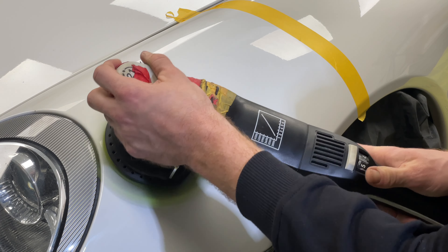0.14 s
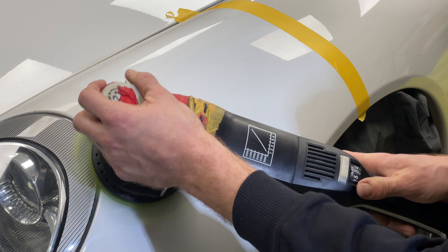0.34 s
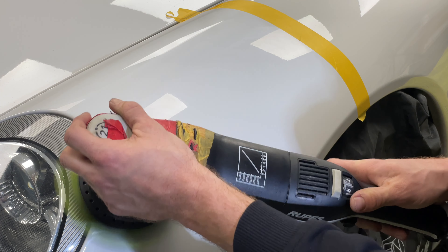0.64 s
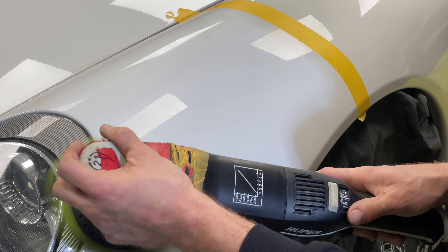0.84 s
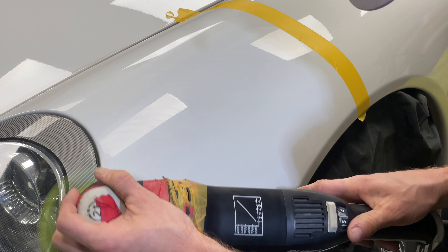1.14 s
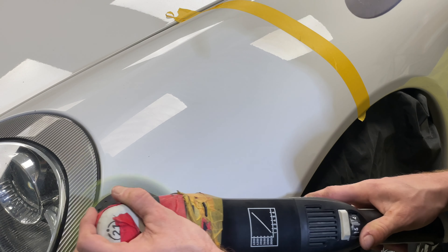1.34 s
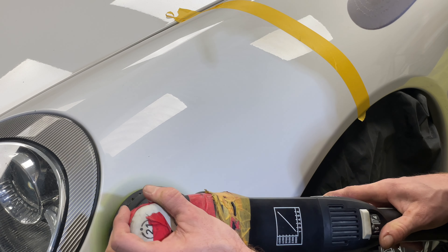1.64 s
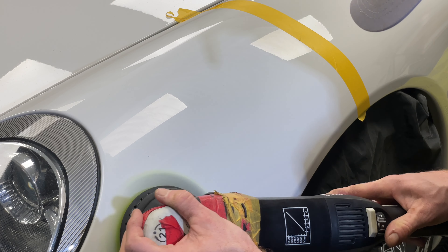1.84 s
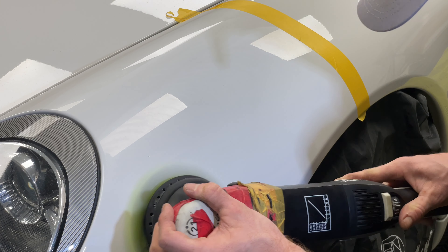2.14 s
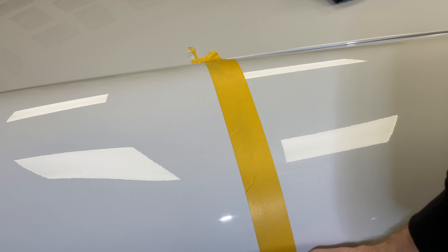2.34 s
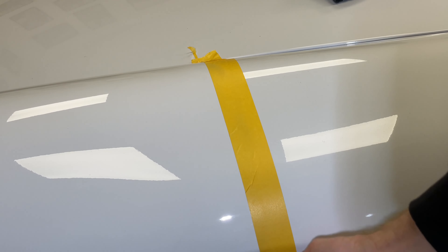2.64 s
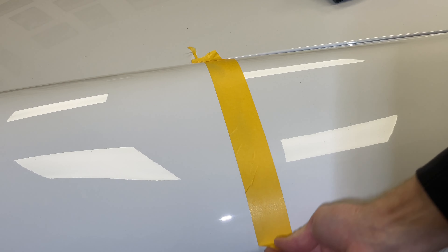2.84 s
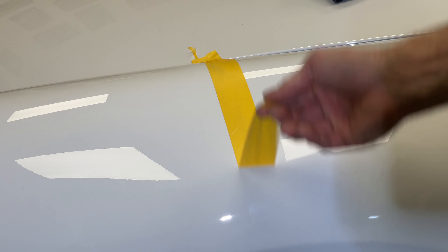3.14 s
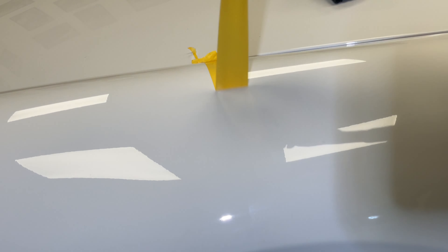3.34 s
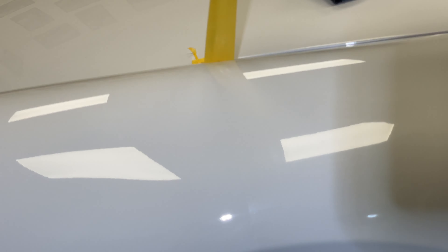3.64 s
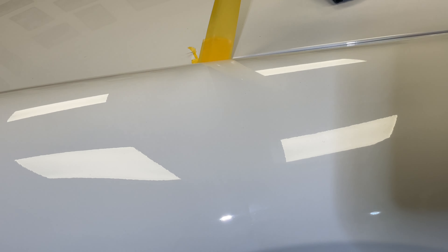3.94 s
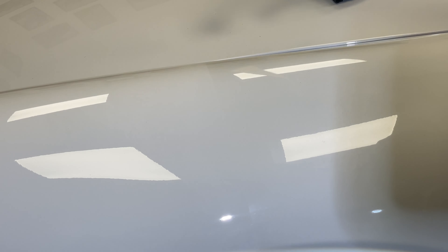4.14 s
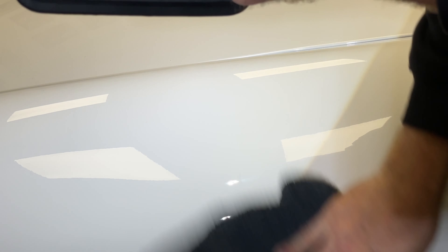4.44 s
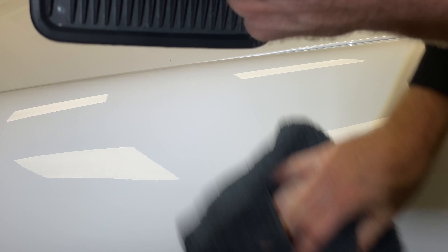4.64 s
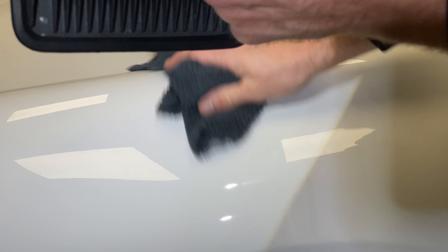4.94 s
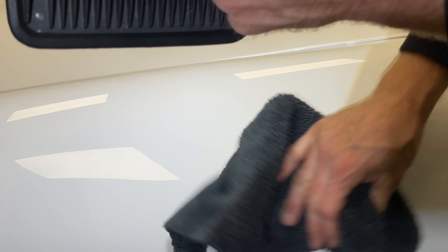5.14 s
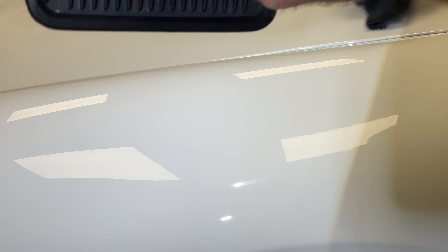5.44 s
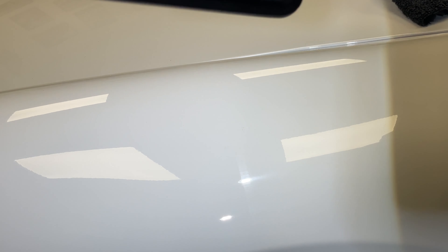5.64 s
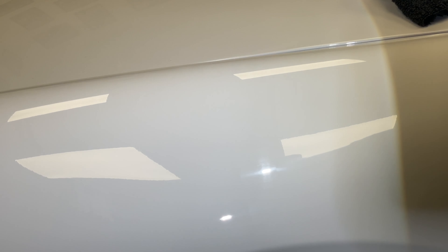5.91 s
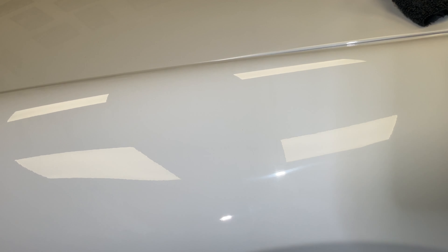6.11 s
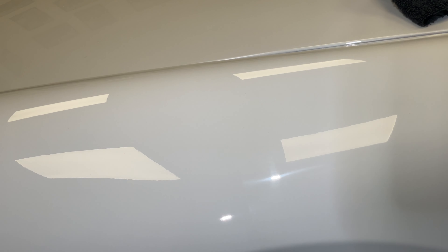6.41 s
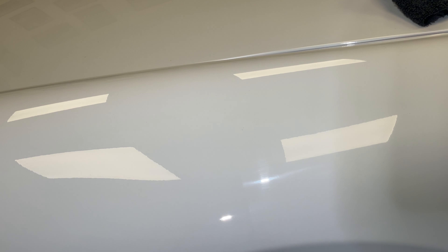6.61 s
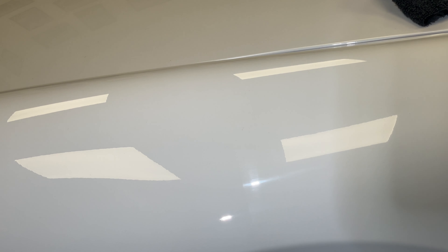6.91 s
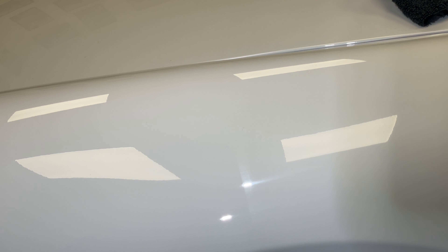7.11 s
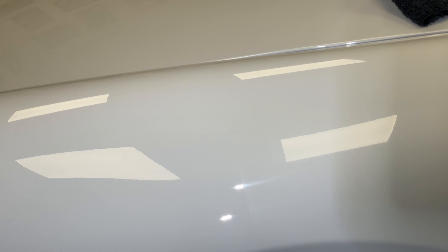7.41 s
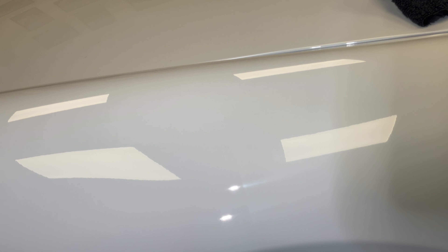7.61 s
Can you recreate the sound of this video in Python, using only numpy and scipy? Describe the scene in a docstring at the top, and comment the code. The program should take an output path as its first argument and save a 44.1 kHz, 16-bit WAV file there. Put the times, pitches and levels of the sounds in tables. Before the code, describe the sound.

Close in a small workshop, an orbital polisher throbs, hisses and whines steadily on a car wing, then stops dead. Much quieter, masking tape peels away in crackling pulls that make the panel drum, and snaps free with sharp cracks and a low boom. A cloth wipes softly with dull thumps on the metal, then rustles and clicks in the hands, leaving a faint low room rumble.

```python
"""First an orbital polisher throbs, rubs and whines on a car wing in a workshop, then stops abruptly.
Masking tape crackles off the panel, which drums along and booms when the tape snaps free.
A cloth wipes the paint, then rustles and clicks softly in the hands over a low room rumble.
Machine tones are sines locked to shaft rotation; rub, tape and cloth are coloured random grains;
blows and clicks excite resonances."""
import sys
import numpy as np
from scipy import signal
from scipy.fft import rfft, irfft, next_fast_len
from scipy.io import wavfile
from scipy.ndimage import uniform_filter1d, map_coordinates

SR = 44100
rng = np.random.default_rng(int(sys.argv[2]) if len(sys.argv) > 2 else 0)


def waveform_to_disk(signal):
    """Save audio, clipped to [-1, 1], as 16-bit WAV at the path in sys.argv[1]."""
    frames = np.transpose(np.atleast_2d(signal))
    scaled = np.clip(frames, -1, 1) * 32767
    samples = np.round(scaled).astype(np.int16)
    wavfile.write(sys.argv[1], SR, samples)


N = 342657
TIME = np.arange(N) / SR
PADDED = next_fast_len(N + SR // 10)
FFT_HZ = np.arange(PADDED // 2 + 1) * SR / PADDED
SIDES = np.array([[.5], [-.5]])   # left and right share a difference equally

# speed of the gears: (time [s], tooth-mesh frequency [Hz])
MESH_SPEED = [(0, 2919), (.3, 2932), (.9, 2929), (1.3, 2921), (1.65, 2926), (2.04, 2931), (2.24, 2924)]
TEETH, PINION_TEETH, MAINS_HZ = 43, 6, 50
SPEED_WAVER = .0009   # as a share of the speed
ORBIT_RIPPLE = .34 - .18   # swing of whine and housing level, once a turn


def polisher():
    """A mains motor drives the orbiting pad through one gear pair; the pad's swing loads its sounds each turn."""
    mesh_hz = in_time(MESH_SPEED)[0]
    turns = np.cumsum(mesh_hz / TEETH * (1 + SPEED_WAVER * drift(40))) / SR
    motor_turns = turns * TEETH / PINION_TEETH
    torque = np.sin(2 * np.pi * 2 * MAINS_HZ * TIME)   # pulses twice each mains cycle
    swing = np.sin(2 * np.pi * turns)   # the eccentric loads pad and teeth once a turn
    orbit = pad(turns, swing)
    whine, shrill = gears(turns, motor_turns, torque)
    rattle = housing(turns) * (1 + 0.08 * torque)
    hiss = rattle * (1 + ORBIT_RIPPLE * swing) + (rub() + judder()) * (1 + 0.053 * swing)
    # bodywork and walls throw the hiss back and ripple its colour
    hiss = hiss + amp(-11) * reflections(hiss, t60=.2)
    return orbit + whine * (1 + ORBIT_RIPPLE * swing) + shrill + motor(motor_turns) + hiss


# upper orbit tones: (multiple of spindle speed, level [dB], re 1.77 dB below the throb)
ORBIT_TONES = [(4, -22), (5, -16.5), (6, -20.5), (7, -24.5)]
# third harmonic of the pad: (time [s], level [dB])
THIRD_LEVEL = [(0.0, -46.5), (0.17, -46.5), (0.34, -58), (0.58, -39.5), (1.61, -42.5), (2.222, -37.5)]
# the pad slides down the wing: (time [s], position [0 on top to 1 at the lower edge])
TRAVEL = [(.55, 0.074), (1.3, 1)]
# fundamental: (level with the pad on top [dB], level at the lower edge [dB])
THROB_LEVELS = (-28.5, -28)
# second harmonic: (level with the pad on top [dB], level at the lower edge [dB])
SECOND_LEVELS = (-34.5, -38.5)


def pad(turns, swing):
    """The orbiting pad throbs once a turn, with harmonics whose balance shifts as it slides down the wing."""
    travel = in_time(TRAVEL)[0]
    throb_db, second_db = (top + (edge - top) * travel for top, edge in (THROB_LEVELS, SECOND_LEVELS))
    throb = np.sqrt(2) * (amp(throb_db) * swing - amp(second_db) * np.sin(4 * np.pi * turns))
    unsteady_turns = turns + .012 * drift(35)
    shake = amp(throb_db - 1.77) * tones(unsteady_turns, ORBIT_TONES, waver_db=3, waver_rate=11)
    third = amp(in_time(THIRD_LEVEL)[0]) * tones(turns, [(3, 0)], waver_db=.8, waver_rate=7)
    return throb + shake + third


# gear tones that follow the whine: (multiple of spindle speed, level against the whine [dB])
MESH_TONES = [(43, 1), (44, -13), (45, -19.5), (86, -21.5), (172, -39)]
# gear whine: (time [s], level [dB])
WHINE_LEVEL = [(0, -32), (.15, -29.5), (.35, -25), (.82, -25), (.92, -29), (1.1, -32), (1.22, -45),
               (1.55, -34.5), (2.24, -28.5)]
# higher companion of the whine: (time [s], level [dB])
UPPER_WHINE_LEVEL = [(0, -33.5), (.33, -31), (.58, -32), (0.898, -38), (1.199, -45), (1.46, -39.5),
                     (1.75, -43), (2.05, -53)]
# two shrill partials above the whine: (time [s], level [dB])
SHRILL_LEVEL = [(0, -55), (.6, -39.5), (1.1, -38), (1.55, -52), (2.2, -46.5)]
UPPER_WHINE_ORDER = 50   # multiple of spindle speed
BACKLASH_TURNS, WHINE_WAVER_DB, TORQUE_RIPPLE = .00065, 1.15, .34


def gears(turns, motor_turns, torque):
    """Meshing teeth whine at multiples of the spindle speed; backlash jitters their phase."""
    play = turns + BACKLASH_TURNS * drift(120)   # the teeth meet early or late
    whine = amp(in_time(WHINE_LEVEL)[0]) * tones(play, MESH_TONES, WHINE_WAVER_DB, waver_rate=36)
    whine = whine * (1 + TORQUE_RIPPLE * torque)
    upper = tones(play, [(UPPER_WHINE_ORDER, 0)], waver_db=1.8, waver_rate=40)
    upper = amp(in_time(UPPER_WHINE_LEVEL)[0]) * upper
    shrill = tones(motor_turns, [(8, 0)], waver_db=1.5, waver_rate=50)
    shrill = shrill + tones(play, [(62, -7.5)], waver_db=2.5, waver_rate=50)
    return whine + upper, amp(in_time(SHRILL_LEVEL)[0]) * shrill


# armature and fan: (multiple of motor speed, level against the motor curve [dB])
MOTOR_TONES = [(2, -5), (4, -1), (12, -5.5), (14, -14), (16, -5), (24, -19)]
# armature and fan together: (time [s], level [dB])
MOTOR_LEVEL = [(0, -51), (1.38, -40.5), (2.24, -52)]


def motor(motor_turns):
    """Armature and fan sing at multiples of the motor speed."""
    return amp(in_time(MOTOR_LEVEL)[0]) * tones(motor_turns, MOTOR_TONES, waver_db=0.5, waver_rate=21)


def tooth_knocks(turns, repeat_share=0.092, size=640):
    """Gear teeth knock unevenly: partly by chance, partly in a pattern of wear that comes round every turn."""
    wear = unit(irfft(np.exp(2j * np.pi * rng.random(size // 2 + 1))))
    share = np.clip(repeat_share, 0, 1)
    repeating = wear[(turns * size).astype(int) % size]
    return np.sqrt(share) * repeating + np.sqrt(1 - share) * grains(14000, spread_db=-0.5)


# housing modes: (frequency [Hz], width before broadening [Hz], level against its curve [dB],
# curve [0 lower, 1 upper])
HOUSING_MODES = [(2900, 350, 2, 0), (3147, 280, -6, 0), (3500, 460, -1.5, 1), (3880, 560, -9.5, 1),
                 (6520, 1500, -8.5, 1)]
# housing ring: (time [s], level of lower modes [dB], level of upper modes [dB])
HOUSING_LEVEL = [(0, -31.5, -29.5), (.54, -35.5, -27.5), (1.08, -38, -33), (1.4, -39.5, -39.5),
                 (2.22, -33, -39)]
HOUSING_FLUTTER_DB = 1.2


def housing(turns):
    """Tooth knocks ring the gear housing; each mode flutters under the grip."""
    low_db, high_db = in_time(HOUSING_LEVEL)
    out = 0
    for hz, width, db, upper in HOUSING_MODES:
        level_db = db + (high_db if upper > .5 else low_db) + HOUSING_FLUTTER_DB * drift(22)
        once = resonate(tooth_knocks(turns), hz, 1.2 * width)
        out = out + amp(level_db) * unit(resonate(once, hz, 1.2 * width))
    return out


# colour of foam rub and cooling air: (frequency [Hz], relative density [dB per Hz])
RUB_COLOUR = [(30, -22.5), (100, -11), (200, -8), (400, -7), (680, -3), (900, -3), (1500, -6.5), (2000, -7),
              (2500, -2), (4200, -7), (5000, -9), (8800, -9.5), (11600, -12.5), (15500, -30.5)]
RUB_DB = -36.5   # rms between 450 and 1800 Hz


def rub():
    """Foam rub and cooling air make one unsteady hiss of dense grains."""
    rubbing = grains(16000, spread_db=-0.05) * amp(0.86 * drift(50))
    return amp(RUB_DB) * colour(rubbing, RUB_COLOUR, band=(450, 1800))


# resonances under the pad: (frequency [Hz], width of each of two passes [Hz], level before bursts [dB])
JUDDER_MODES = [(633, 190, -41), (750, 110, -45), (980, 240, -49.5)]
JUDDER_BURST_DB = 3


def judder():
    """The pad grabs and slips in irregular bursts, which growl in the panel."""
    out = 0
    for hz, width, db in JUDDER_MODES:
        burst = amp(db + JUDDER_BURST_DB * drift(24))
        once = resonate(grains(1500, spread_db=1.5), hz, width)
        out = out + burst * unit(resonate(once, hz, width))
    return out


# pulls: (time of full speed [s], attack [s], hold [s], crackle level [dB], panel drumming level [dB])
PULLS = [(2.852, 0.059, 0.34, -56.5, -48.5), (3.132, 0.22, 0.06, -47, -44.5),
         (3.215, 0.21, 0.16, -42, -42.5), (3.544, 0.12, 0.07, -44.5, -44), (3.768, 0.073, 0.0068, -56, -67),
         (3.838, 0.038, 0.0089, -53.5, -60), (4.022, 0.15, 0.006, -44.5, -52),
         (4.037, .03, 0.0049, -42, -60)]
# colour of the crackle: (frequency [Hz], relative density [dB per Hz])
TAPE_COLOUR = [(100, 3), (350, 2), (700, 0), (1300, -1), (2200, -3.5), (3500, -5.5), (6000, -10),
               (9000, -7), (11500, -11), (13000, -23), (15500, -22.5)]
# wing panel, for drumming and blows: (frequency [Hz], mode level [dB], undamped t60 [s])
PANEL_MODES = [(69.6, -2, 0.71), (134.8, -1.5, 0.31), (167.4, -14.5, 0.58), (200.7, -7.5, 0.21),
               (228.5, -10.5, 0.27), (267.5, -6.5, 0.2), (340, -3.5, 0.11), (372, -10, 0.19),
               (438, -12, 0.051), (480, -12, 0.058)]
PULL_RELEASE_S, TAPE_FREE_S = 0.087, 4.04
# the taut tape damps the panel and favours its higher modes
DRUM_RING_SHARE, DRUM_TILT_DB_PER_OCTAVE = 0.12, 9.5


def tape():
    """With each pull, glue threads break by the thousand and tug at the sheet metal."""
    pulls = np.array([swell(at, attack_s, hold_s, PULL_RELEASE_S) for at, attack_s, hold_s, _, _ in PULLS])
    crackle_db, drum_db = np.transpose(PULLS)[3:, :, None]
    breaks = grains(9000, spread_db=0.6) * amp(1.4 * drift(130))
    # the taut strip rings at pitches that keep trading strength
    strip = sum(resonate(breaks, hz, 0.036 * hz) * drift(12) for hz in np.geomspace(450, 4000, num=14))
    crackle = colour(breaks + 0.45 * strip, TAPE_COLOUR, band=(700, 7000))
    drum = np.zeros(N)
    for k, (hz, db, t60) in enumerate(PANEL_MODES):
        gain = amp(db + DRUM_TILT_DB_PER_OCTAVE * np.log2(hz))
        drum += gain * ring(breaks, hz, DRUM_RING_SHARE * t60) * (-1) ** k
    # the steady pull keeps the panel drumming evenly
    drum = even(cut(drum, 165, "high", order=5), window_s=.03)
    stuck = np.clip((TAPE_FREE_S - TIME) / 0.022, 0, 1)   # once free, the tape no longer pulls on the panel
    crackle_level = (amp(crackle_db) * pulls).max(axis=0)
    drum_level = (amp(drum_db) * pulls).max(axis=0)
    return crackle_level * crackle + drum_level * drum * stuck


TWANG_S, TWANG_DB, TWANG_T60_S = 4.016, -34, 0.09
TWANG_START_HZ, TWANG_END_HZ, TWANG_SAG_S = 1420, 310, 0.0043


def twang():
    """As the tape tears loose its tension drops, and its ring dives in pitch."""
    age = np.maximum(TIME - TWANG_S, 0)
    hz = TWANG_END_HZ + (TWANG_START_HZ - TWANG_END_HZ) * np.exp(-age / TWANG_SAG_S)
    level = amp(TWANG_DB - 60 * age / TWANG_T60_S)
    return level * np.sin(2 * np.pi * np.cumsum(hz * (age > 0)) / SR)


# blows on the panel: (time [s], knock level [dB], frequency the spot favours [Hz], brush level [dB]);
# both levels are before the soft low-pass
THUMPS = [(2.379, -45, 89, -56), (2.405, -51, 425, -58), (3.382, -35.5, 150, -46.5), (4.023, -30, 180, -49),
          (4.047, -28, 66, -60), (4.059, -30.5, 81.5, -46), (4.472, -44, 423, -53.5),
          (4.805, -51, 300, -52.5), (4.828, -40.5, 143, -67), (4.926, -50, 160, -76),
          (5.441, -58, 400, -49.5), (5.476, -48.5, 354, -56), (5.503, -40.5, 121, -70)]


def thumps(octave_db=-9, soft_hz=900, brush_s=0.025):
    """Soft blows set the panel booming in the modes that move most at the spot, with a dull brush as they land."""
    at, db, spot_hz, brush_db = np.transpose(THUMPS)
    boom = np.zeros(N)
    for k, (hz, mode_db, t60) in enumerate(PANEL_MODES):
        push = np.zeros(N)
        push[np.round(at * SR).astype(int)] = amp(db + mode_db + octave_db * abs(np.log2(hz / spot_hz)))
        boom += ring(push, hz, t60) * (-1) ** k
    age = np.maximum(TIME - at[:, None], 0) / brush_s
    pressure = amp(brush_db) @ (age * np.exp(1 - age))
    dull = [(60, -22.0), (140, 10.0), (300, -0.5), (600, -10), (2000, -26.0)]   # (Hz, dB per Hz)
    brush = unit(colour(rng.standard_normal(N), dull))
    return cut(boom + pressure * brush, soft_hz, "low")


# strokes of fabric: (time of full speed [s], attack [s], hold [s], release [s], slide level [dB],
# fibre crackle level [dB], touch [name])
STROKES = [(2.326, 0.11, 0.052, 0.08, -61, -65.5, "brush"), (2.547, 0.062, .01, 0.06, -67, -72, "brush"),
           (2.786, 0.12, 0.049, 0.045, -68, -65.5, "brush"), (4.1, 0.046, 0.17, .08, -73, -75.5, "brush"),
           (4.268, 0.02, 0.27, .1, -66, -75.5, "wipe"), (4.474, 0.033, 0.011, 0.04, -51, -73, "wipe"),
           (4.475, 0.006, 0.0038, 0.014, -44.5, -72, "wipe"), (4.533, .1, 0.066, 0.26, -64.5, -82, "wipe"),
           (4.653, .08, 0.041, .15, -67, -78, "wipe"), (4.758, 0.089, 0.038, 0.15, -67, -76, "wipe"),
           (4.965, 0.1, .01, 0.047, -63, -82, "wipe"), (4.888, 0.18, 0.38, 0.059, -71, -80, "wipe"),
           (5.485, 0.042, 0.006, 0.06, -59, -71, "gather"), (5.59, 0.064, 0.07, 0.87, -62, -71.5, "gather"),
           (5.825, 0.11, 0.023, 0.1, -55, -77, "gather"),
           (5.833, 0.016, 0.082, 0.054, -62.5, -60, "gather"),
           (6.012, 0.055, 0.17, 0.049, -60, -63, "fumble"), (6.242, 0.01, 0.008, 0.19, -53, -82, "rub"),
           (6.39, 0.21, 0.048, 0.059, -50, -72, "rub")]
# ways of touching the cloth, by name: (low cut [Hz], rasp [dB], slips [per s], spread of slip sizes [dB])
TOUCHES = {"brush": (295, -12, 20004.5, 0), "wipe": (150, -25.5, 9010, 2), "gather": (438, -20, 10997.5, 0),
           "fumble": (1206, 3, 2900, 0.85), "rub": (1330, -31, 13001, 3)}
# colour of the slide: (frequency [Hz], relative density [dB per Hz])
CLOTH_COLOUR = [(200, -1), (500, 5.5), (1000, 6), (1900, 3.5), (3300, 1.5), (5000, -5), (8000, -9),
                (11000, -6), (15000, -51)]
# colour of catching fibres: (frequency [Hz], relative density [dB per Hz])
FIBRE_COLOUR = [(3000, -40), (6000, -6.5), (8500, 0.5), (11600, -2), (13000, -9), (15500, -14)]


def cloth(rasp_hz=3500, rasp_width_hz=1500, grip_db=1.0, grip_rate=30):
    """Fabric slips softly, each touch with its own low cut and rasp; catching fibres add a fine crackle."""
    fibres = colour(grains(5400, spread_db=1.0), FIBRE_COLOUR, band=(10000, 15000))
    sliding, catching = dict.fromkeys(TOUCHES, 0), 0
    for at, attack_s, hold_s, release_s, slide_db, fibre_db, touch in STROKES:
        speed = swell(at, attack_s, hold_s, release_s)
        sliding[touch] = np.maximum(sliding[touch], amp(slide_db) * speed)
        catching = np.maximum(catching, amp(fibre_db) * speed)
    out = catching * fibres
    grip = amp(grip_db * drift(grip_rate))   # the fabric drags unevenly
    for touch, (low_hz, rasp_db, per_s, spread_db) in TOUCHES.items():
        slips = cut(grains(per_s, spread_db), low_hz, "high")
        rasp = amp(rasp_db) * resonate(slips, rasp_hz, rasp_width_hz)
        out += grip * sliding[touch] * colour(slips + rasp, CLOTH_COLOUR, band=(900, 5000))
    return out


# tape snaps and handling clicks: (time [s], peak before an 8 dB lift and low-pass [dB], ring [Hz],
# treble before the bright lift [dB])
CLICKS = [(3.5985, -30, 3210, -12), (4.015, -22, 3330, -18), (4.0438, -26.5, 2700, -13),
          (4.049, -19.5, 4250, -1), (4.476, -57, 2600, -30), (5.45, -60, 3500, -16),
          (5.481, -53, 2620, -25), (5.624, -37, 2700, -11), (5.9915, -41.5, 3180, -17),
          (6.008, -45, 2300, -25), (6.0303, -41.5, 2870, -16), (6.1025, -33.5, 4640, -7),
          (6.1064, -27, 4700, 3.5), (6.1268, -31, 5140, -1), (6.137, -31, 2440, -12),
          (6.208, -40, 4170, -13), (6.242, -44, 3120, -29), (6.351, -33.5, 2260, 17),
          (6.4118, -37.5, 4300, -33)]
CRACK_S = .0005   # time to the crack's peak


def clicks(tail_s=0.017, tail_db=-18, width_hz=1200, body_db=-9,
           bright_db=6, bright_hz=8500, bright_width_hz=6000):
    """A sharp crack with a short ring and a scatter after it."""
    out, t = np.zeros(N), TIME[:SR // 10]
    for s, db, hz, treble_db in CLICKS:
        strike = t / CRACK_S * np.exp(1 - t / CRACK_S)
        scatter = amp(tail_db) * np.exp(-t / tail_s)
        crack = rng.standard_normal(len(t)) * (strike + scatter)
        body = amp(body_db) * cut(cut(crack, 710, "high", order=1), 14000, "low")
        snap = resonate(resonate(crack, bright_hz, bright_width_hz), bright_hz, bright_width_hz)
        click = resonate(crack, hz, width_hz) + body + amp(treble_db + bright_db) * snap
        at = round(s * SR)
        out[at:at + len(t)] += amp(db + 8.0) * click / abs(click).max()
    return cut(out, 11700, "low", order=4)


# buckling folds: (time [s], peak before the lift and low-pass [dB])
CRINKLES = [(6.562, -50), (6.5779, -54), (6.5869, -58), (6.6104, -49), (6.6397, -48), (6.6514, -57),
            (6.6604, -56), (6.6874, -56), (6.7141, -51), (6.744, -47), (6.764, -55), (6.7735, -54),
            (6.882, -53)]
# colour of the crackle of small folds: (frequency [Hz], relative density [dB per Hz])
FOLD_COLOUR = [(700, -6.5), (1800, -9), (3200, -3), (4400, -6.5), (6200, -17), (12000, -18.5),
               (15000, -39.5)]
# crackle of small folds: (time [s], level [dB])
FOLD_LEVEL = [(6.4, -110), (6.5, -68), (6.66, -64.5), (6.88, -73), (7.02, -83), (7.08, -110)]


def crinkles(level_db=3, ring_hz=3300, width_hz=2100, snap_s=0.0006, top_hz=5800):
    """Folds of the cloth buckle with small dry ticks, each at a slightly different pitch."""
    out, t = np.zeros(N), TIME[:SR // 50]
    for s, db in CRINKLES:
        hz = ring_hz * 2 ** rng.normal(0, 0.11)
        snap = rng.standard_normal(len(t)) * np.exp(-t / snap_s)
        tick = resonate(resonate(snap, hz, width_hz), hz, width_hz)
        at = round(s * SR)
        out[at:at + len(t)] += amp(db + level_db) * tick / abs(tick).max()
    # between them runs a steady crackle of smaller folds, fading as the hands come to rest
    folds = even(colour(grains(3000, spread_db=1.5), FOLD_COLOUR, band=(2000, 5000)), window_s=.012)
    return cut(out, top_hz, "low") + amp(in_time(FOLD_LEVEL)[0]) * folds


# workshop rumble: (frequency [Hz], relative density [dB per Hz])
RUMBLE_COLOUR = [(20, -12), (45, -1.5), (75, -2.5), (115, -17.5), (160, -17), (210, -19.5), (275, -16),
                 (380, -27), (500, -27.5), (750, -37), (1100, -45), (2500, -55), (15000, -68)]
RUMBLE_DB = -55


def room_rumble():
    """Steady noise, coloured towards the bass, fills the workshop."""
    return amp(RUMBLE_DB) * unit(colour(rng.standard_normal(N), RUMBLE_COLOUR))


# reflections that differ between the ports: (frequency [Hz], level [dB])
SPREAD = [(60, -34.5), (140, -15.5), (220, -9), (620, -10), (1100, -5), (1800, -44), (2800, -17.5),
          (4200, -13.5), (6000, -6.5), (11000, -19), (14000, -30.5)]


def stereo(mid, t60):
    """Close sounds reach both ports alike; only their reflections differ."""
    side = colour(reflections(mid, t60), SPREAD)
    return np.array([mid + side, mid - side])


def reflections(x, t60, delay=0.0021):
    """A dense dying tail of the same power as the sound."""
    t = TIME[:SR // 2]
    tail = rng.standard_normal(len(t)) * np.exp(-np.log(1000) * t / t60) * (t > delay)
    return signal.fftconvolve(x, tail / np.sqrt(np.sum(tail ** 2)))[:N]


def tones(turns, orders, waver_db, waver_rate):
    """Multiples of a shaft's rotation, each wavering in strength."""
    out = 0
    for k, db in orders:
        strength = np.sqrt(2) * amp(db + waver_db * drift(waver_rate))
        out = out + strength * np.sin(2 * np.pi * (round(k) * turns + rng.random()))
    return out


def swell(at, attack_s, hold_s, release_s):
    """A hand movement: grows tenfold over the attack, holds, and falls to a tenth over the release."""
    early, late = np.maximum(at - TIME, 0), np.maximum(TIME - at - hold_s, 0)
    return 10 ** -np.minimum(early / attack_s + late / release_s, 10)


def grains(per_s, spread_db):
    """Random tiny slips of uneven size; rms 1."""
    size = amp(spread_db * np.minimum(rng.exponential(1, N), 5))
    return unit((rng.random(N) < per_s / SR) * size * rng.standard_normal(N))


def drift(rate):
    """A smooth curve through random knots of spread 1, at so many knots a second."""
    knots = rng.standard_normal(4000)
    return map_coordinates(knots, [TIME * rate], order=3, mode="wrap")


def resonate(x, hz, width_hz):
    """A resonance with gain 1 on top."""
    r = np.exp(-np.pi * width_hz / SR)
    zeros = np.array([1, 0, -1]) * (1 - r * r) / 2
    return signal.lfilter(zeros, [1, -2 * r * np.cos(2 * np.pi * hz / SR), r * r], x + 1e-18)


def ring(x, hz, t60):
    """A unit click sets a decaying sine of initial height 1 ringing."""
    r, w = np.exp(-np.log(1000) / (t60 * SR)), 2 * np.pi * hz / SR
    return signal.lfilter([0, np.sin(w)], [1, -2 * r * np.cos(w), r * r], x + 1e-18)


def cut(x, hz, kind, order=2):
    """Butterworth low- or high-pass."""
    return signal.sosfilt(signal.butter(order, min(hz, SR / 2 - 1), kind, fs=SR, output="sos"), x + 1e-18)


def gains(spectrum):
    """A short spectrum as a gain at every frequency."""
    points, db = np.transpose(spectrum)
    return amp(np.interp(np.log(FFT_HZ + 1), np.log(points), db))


def colour(x, spectrum, band=None):
    """Filter by a spectrum; if a band is given, the rms within it becomes 1."""
    shaped = rfft(x, PADDED) * gains(spectrum)
    if band:
        inside = (FFT_HZ > band[0]) & (FFT_HZ < band[1])
        shaped = shaped * np.sqrt(N * PADDED / 2 / np.sum(abs(shaped[inside]) ** 2))
    return irfft(shaped, PADDED)[:N]


def even(x, window_s):
    """Level out slow swings of strength and keep the fine grain; rms 1."""
    power = uniform_filter1d(x ** 2, int(window_s * SR))
    return unit(x / np.sqrt(abs(power) + 1e-12))


def in_time(rows):
    """Each column of a curve at every sample."""
    s, *columns = np.transpose(rows)
    return [np.interp(TIME, s, c) for c in columns]


def amp(db):
    """Decibels to gain."""
    return 10 ** (np.asarray(db) / 20)


def unit(x):
    """Scale to rms 1."""
    return x / np.sqrt(np.mean(x ** 2) + 1e-20)


# uneven bass of the machine between the ears: (frequency [Hz], left minus right [dB])
MACHINE_BALANCE = [(70, 2.5), (140, -3.5), (300, 0.5), (1500, 0)]
STOP_S, STOP_FADE_S = 2.272, 0.038   # the machine is silent from STOP_S, after this fade
DIP_S, DIP_WIDTH_S, DIP_DB = 4.239, .013, -17   # the level dips briefly


def scene():
    """First the machine, then quiet handwork, over the rumble of the room."""
    machine = rfft(stereo(polisher(), t60=.15), PADDED)
    machine = irfft(machine * gains(MACHINE_BALANCE) ** SIDES, PADDED)[:, :N]
    handwork = tape() + twang() + cloth() + clicks() + crinkles()
    quiet = thumps() + handwork + amp(-13.0) * reflections(handwork, t60=0.11) + room_rumble()
    running = np.clip((STOP_S - TIME) / STOP_FADE_S, 0, 1)
    dip = amp(DIP_DB * np.exp(-((TIME - DIP_S) / DIP_WIDTH_S) ** 2))
    return running * machine + dip * stereo(quiet, t60=0.024)


# left and right part in the treble: (frequency [Hz], phase by which left leads [radians])
TREBLE_PHASE = [(0, 0), (2300, 0), (3100, .55), (5250, .3), (5750, -1.5), (6800, -.7), (7550, -2.3),
                (8700, -3.1), (9600, -3.3), (11600, -5), (12400, -6.28), (16000, -6.28)]
CUTOFF_HZ = 15900


def record(dry, bass_hz=35):
    """Left and right differ in treble phase; deep bass and the top are cut."""
    phase_turn = np.exp(1j * SIDES * np.interp(FFT_HZ, *np.transpose(TREBLE_PHASE)))
    bass_cut = FFT_HZ ** 2 / np.hypot(FFT_HZ ** 2, bass_hz ** 2)
    heard = irfft(rfft(dry, PADDED) * phase_turn * bass_cut, PADDED)[:, :N]
    return signal.sosfilt(signal.ellip(12, .05, 80, CUTOFF_HZ, fs=SR, output="sos"), heard)


dry = scene()
out = record(dry)
waveform_to_disk(out)
```